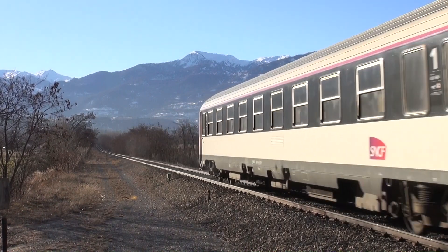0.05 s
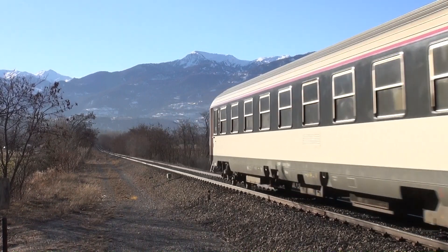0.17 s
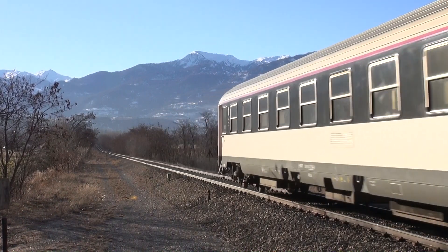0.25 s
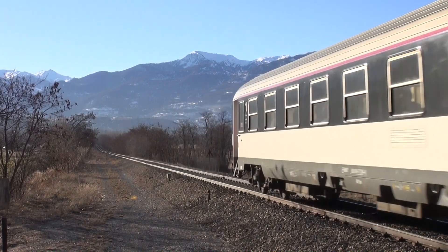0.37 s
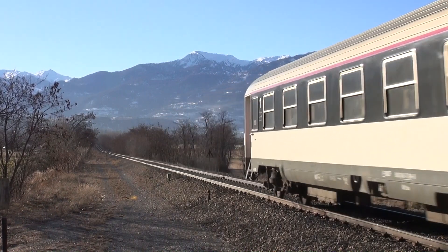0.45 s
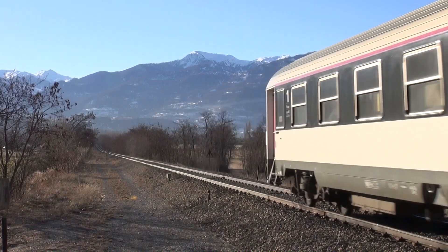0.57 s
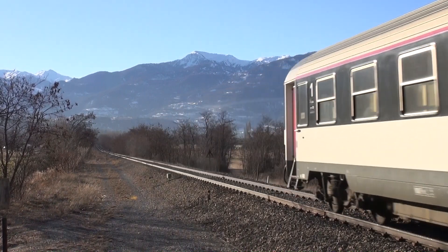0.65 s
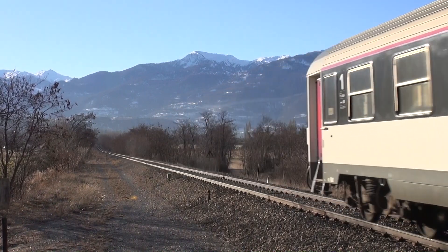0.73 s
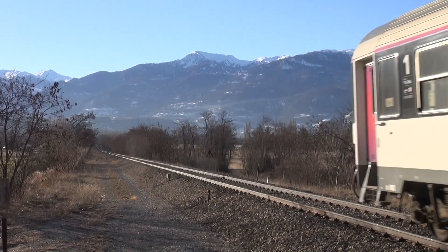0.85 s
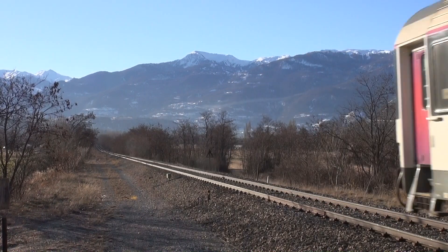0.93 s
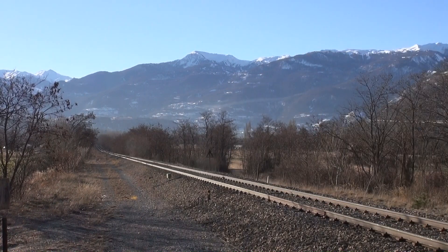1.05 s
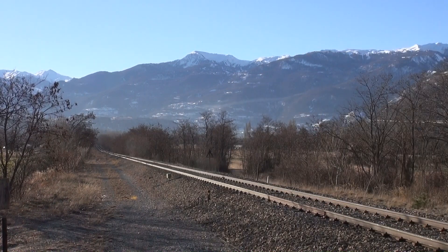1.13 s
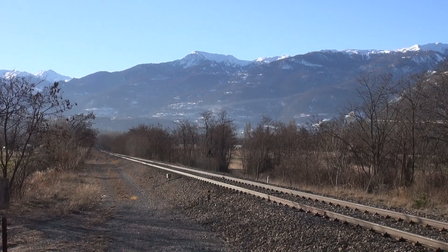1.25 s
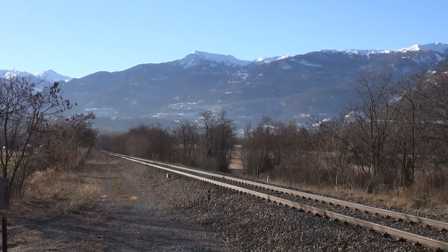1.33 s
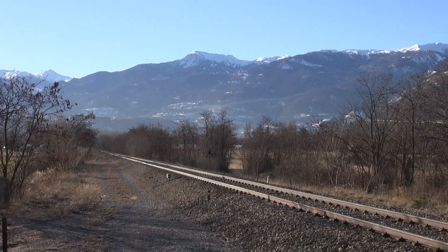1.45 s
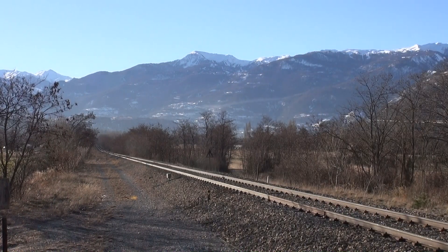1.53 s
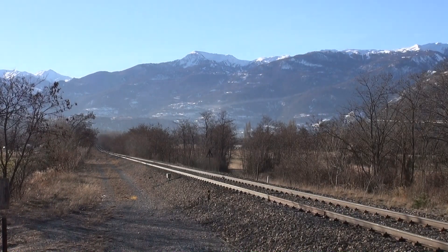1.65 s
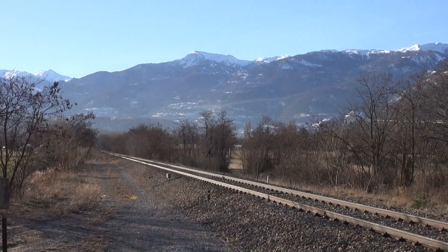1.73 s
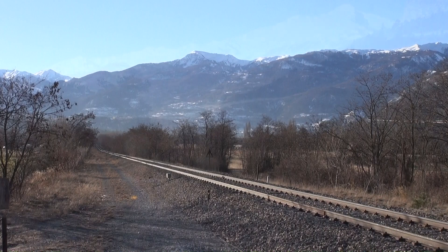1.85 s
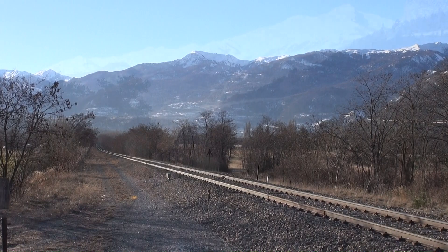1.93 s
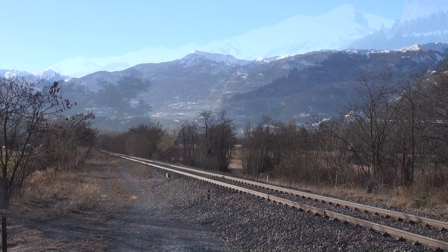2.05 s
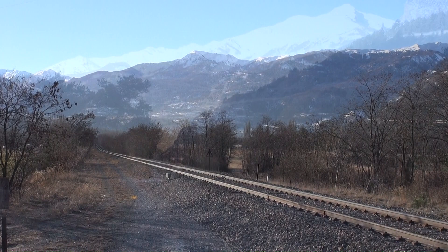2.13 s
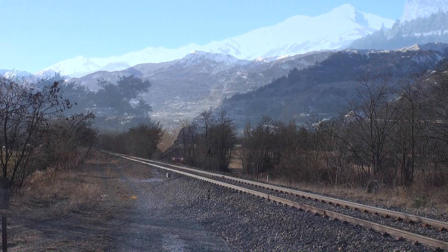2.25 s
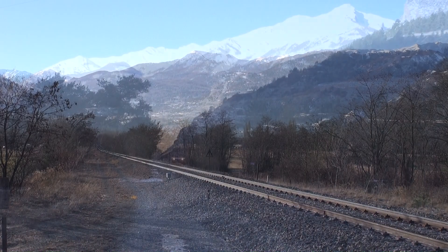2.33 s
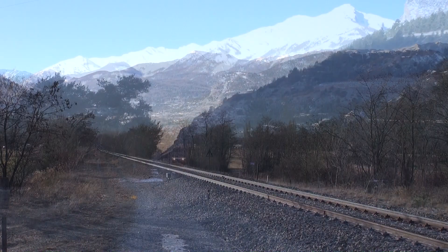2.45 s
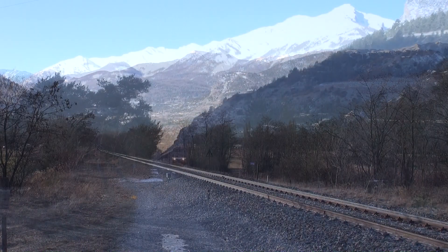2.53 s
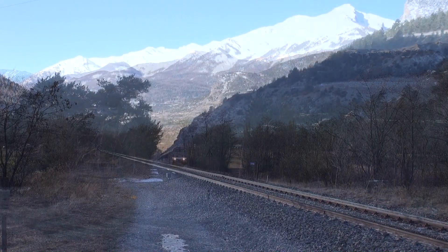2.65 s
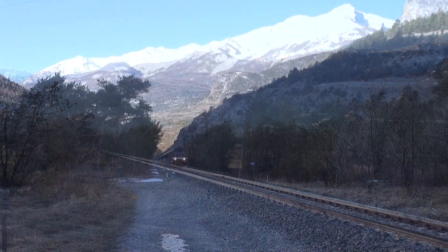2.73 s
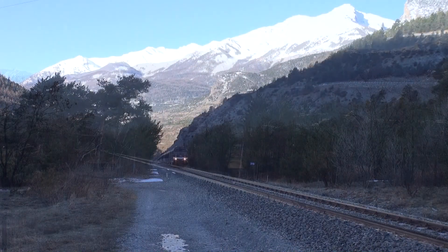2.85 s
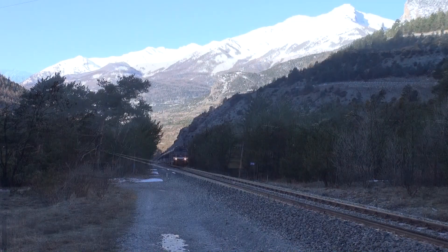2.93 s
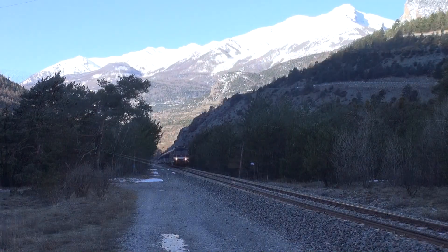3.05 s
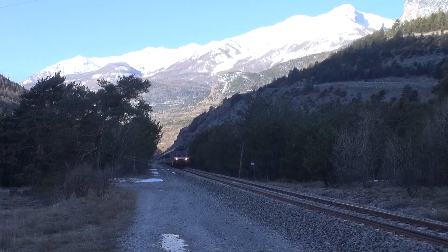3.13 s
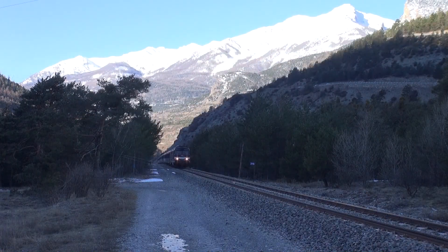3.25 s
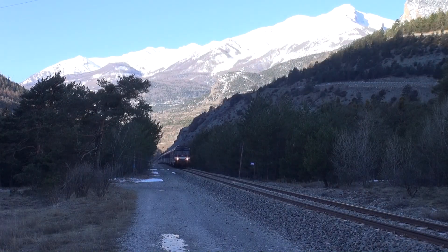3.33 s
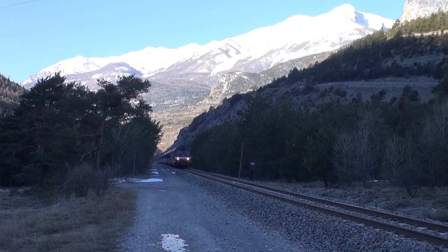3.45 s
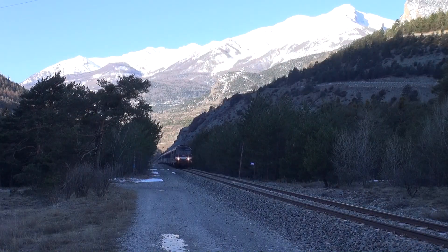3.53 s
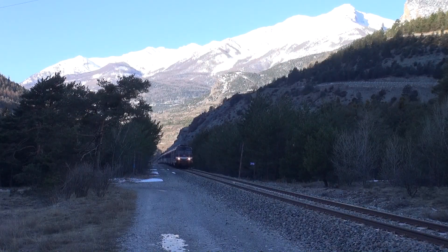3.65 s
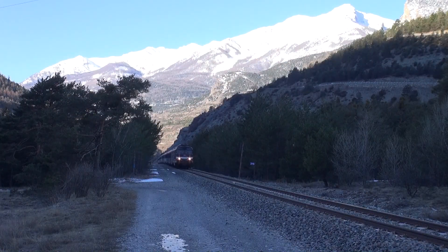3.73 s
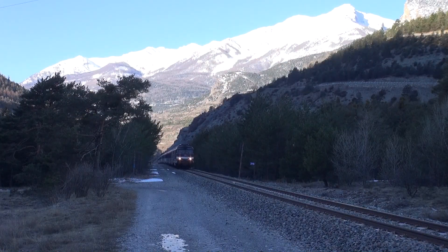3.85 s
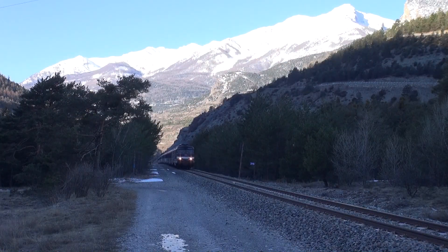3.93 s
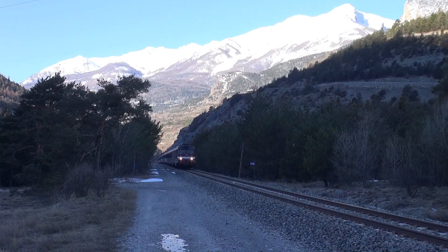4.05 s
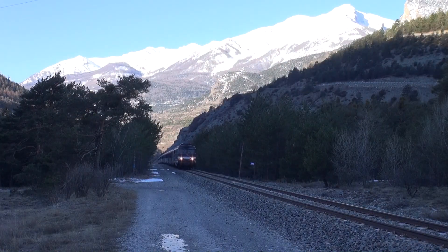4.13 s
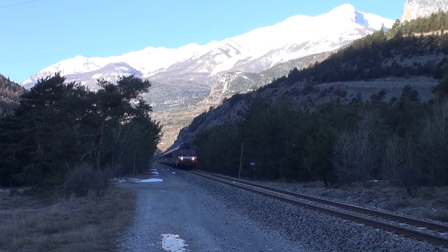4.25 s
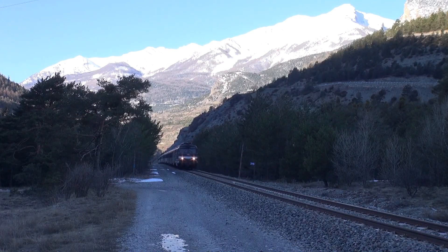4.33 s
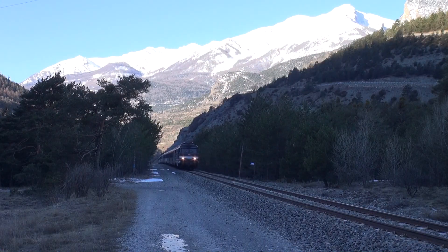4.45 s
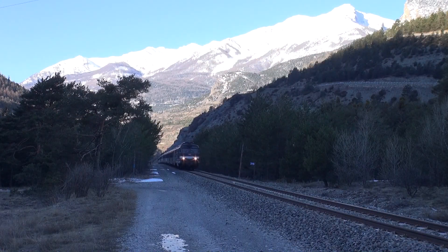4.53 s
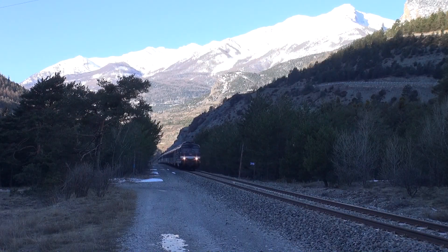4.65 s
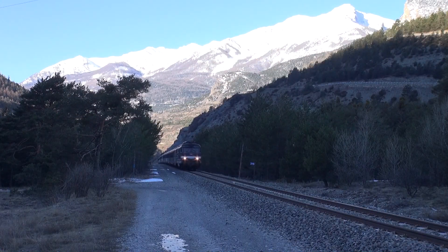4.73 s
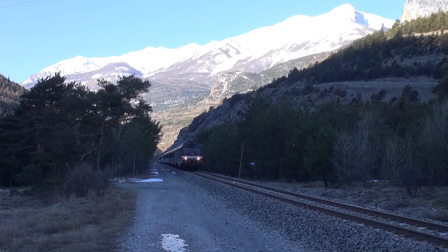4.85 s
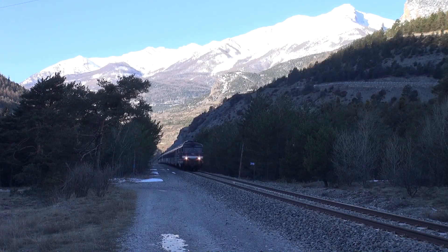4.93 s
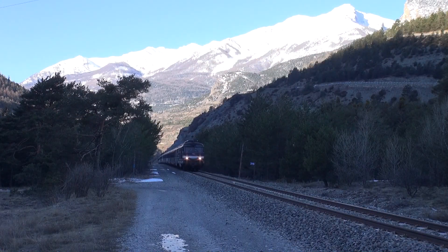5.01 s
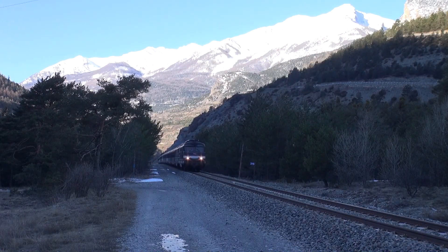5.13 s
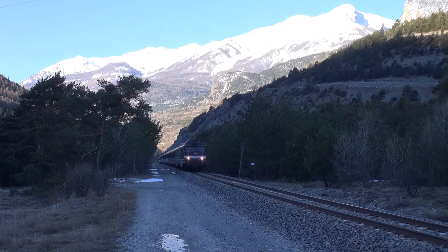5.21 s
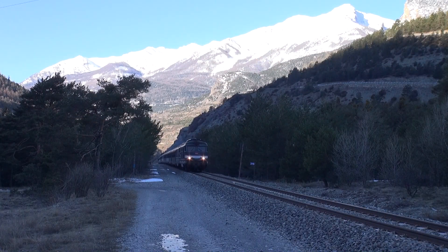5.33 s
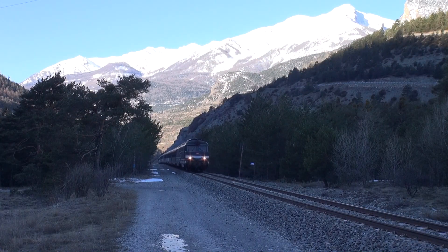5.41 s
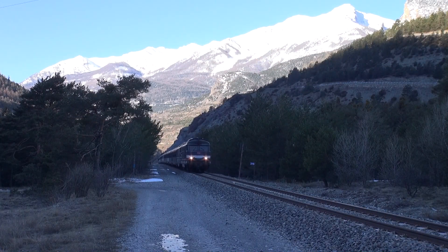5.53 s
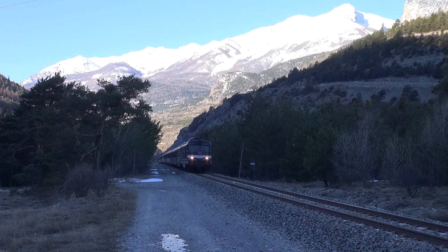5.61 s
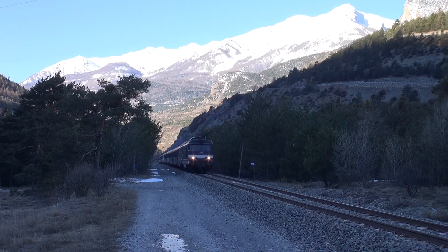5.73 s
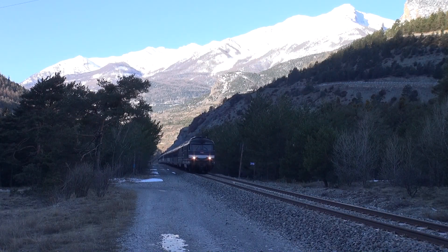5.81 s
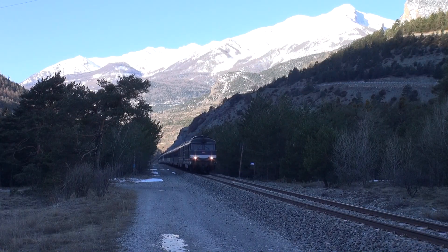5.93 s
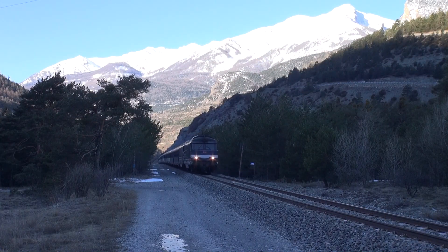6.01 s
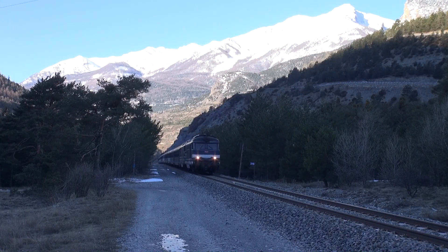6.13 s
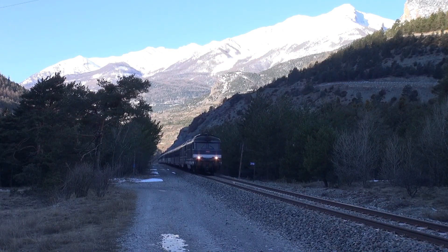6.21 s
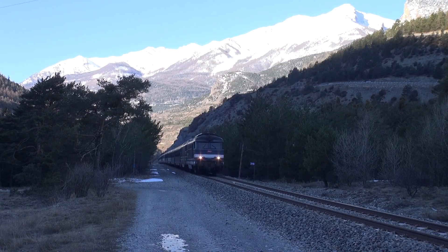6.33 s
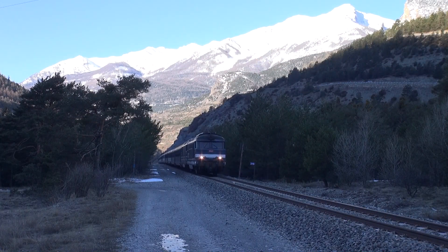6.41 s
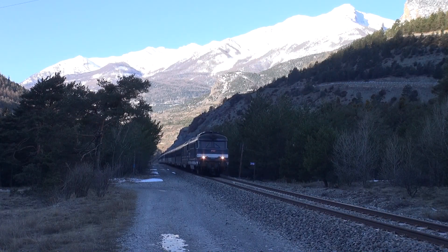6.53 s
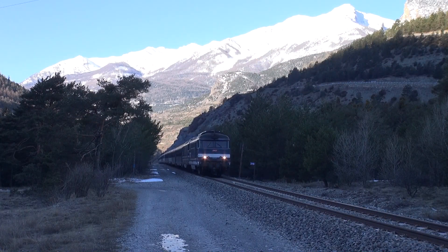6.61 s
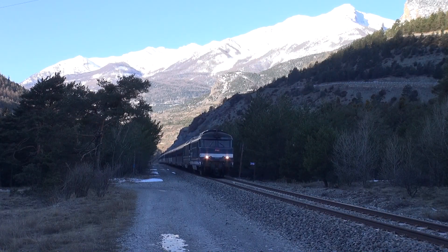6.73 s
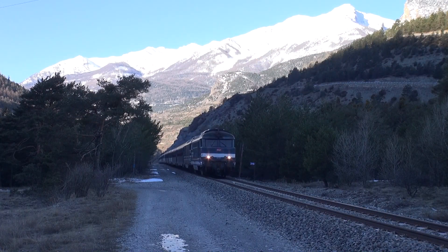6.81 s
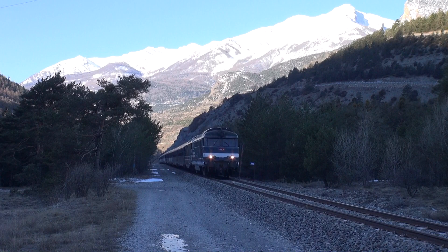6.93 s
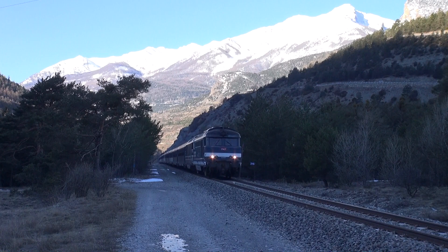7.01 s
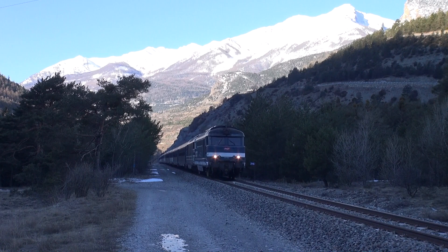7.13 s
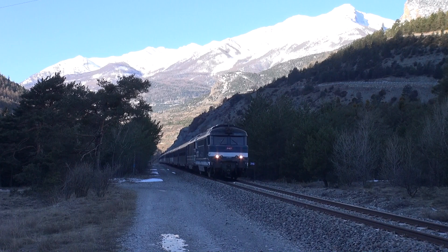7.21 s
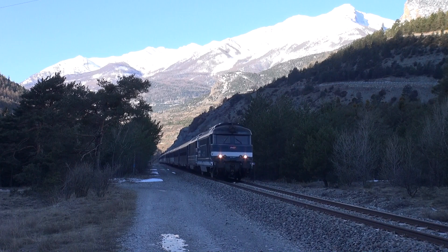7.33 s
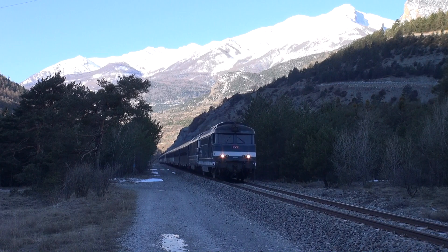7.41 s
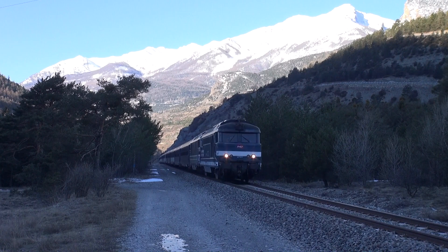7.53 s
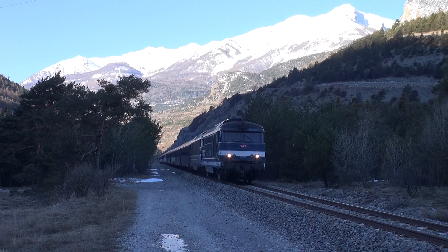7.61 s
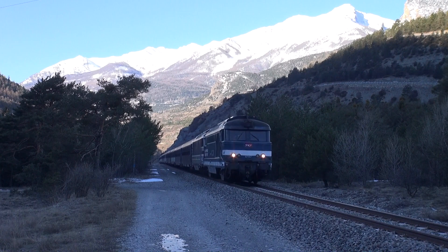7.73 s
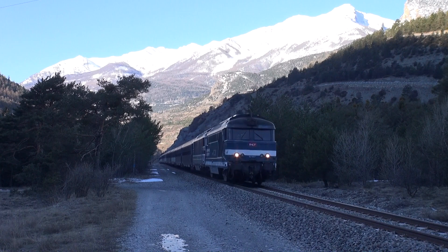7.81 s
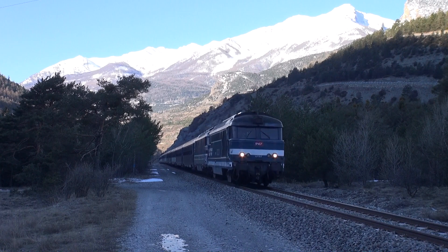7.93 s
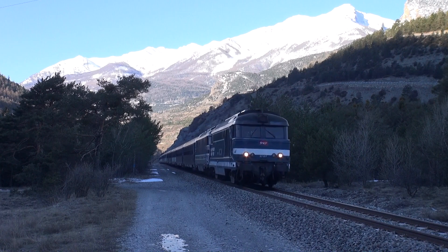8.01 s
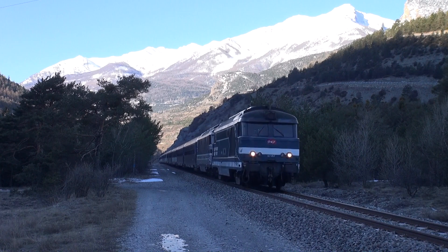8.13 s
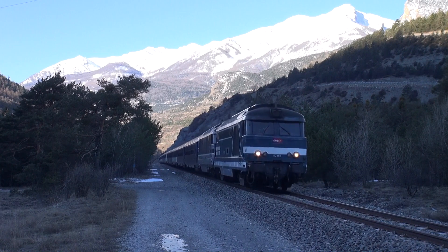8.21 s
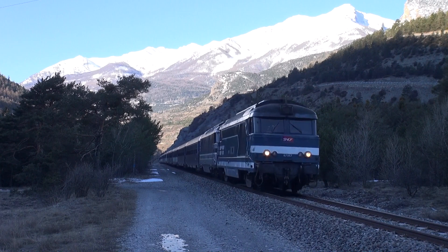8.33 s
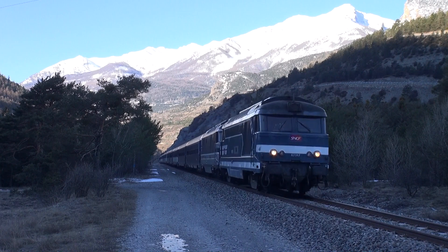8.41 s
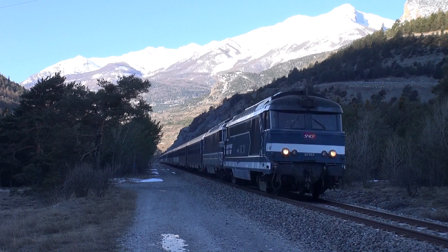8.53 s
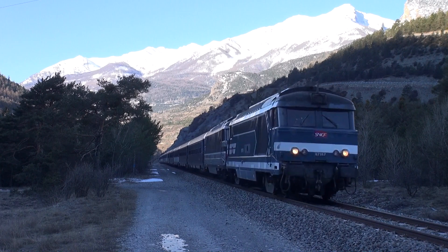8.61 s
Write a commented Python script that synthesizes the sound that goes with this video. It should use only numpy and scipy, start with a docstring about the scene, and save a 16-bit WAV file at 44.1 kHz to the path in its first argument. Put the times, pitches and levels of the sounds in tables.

```python
"""A mountain valley, stereo microphone beside the track: coaches roll past close by on the right and fade.
A diesel locomotive approaches: noise shaped into a rolling roar, a sine-built exhaust note, knocks.
Its horn, summed from partials plus puffs of air, sounds two blasts; between them, short of air, it jumps
to its upper register. Slopes throw the horn back at lower pitch, through long noise tails, and the
recorder's gain control ducks the engine under it."""
import sys
import numpy as np
from scipy import signal
from scipy.fft import rfft, irfft, next_fast_len
from scipy.io import wavfile
from scipy.ndimage import uniform_filter1d

SR = 44100
rng = np.random.default_rng(int(sys.argv[2]) if len(sys.argv) > 2 else 0)


def bounce(signal):
    """Save signal as a 16-bit WAV file at the path given by the first command-line argument."""
    frames = np.transpose(np.atleast_2d(signal))
    limited = np.clip(frames, -1, 1)
    pcm = np.round(limited * 32767).astype(np.int16)
    wavfile.write(sys.argv[1], SR, pcm)


N = 381906
T = np.arange(N) / SR  # s
HZ = np.fft.rfftfreq(1024, 1 / SR)  # bins of the noise spectra
FRAMES = np.arange(N // 256 + 5) * 256 / SR  # s, times of the noise spectra

# slopes that return the moving horn: [pitch factor, delay/s, level/dB]
SLOPES = [(.995, .012, -14.5), (.98, .05, -15.5), (.955, .06, -20), (.897, .08, -22)]
# dying away of the valley's echo: [f/Hz, t60/s]
VALLEY_T60 = [(300, 2.44), (700, 4.14), (1400, 2.63), (2500, 1.2), (5000, 1.3), (12000, .3)]
# colour of the echo off the forest: [f/Hz, level/dB]
FOREST_COLOUR = [(350, 0.5), (700, 1), (1100, -1), (2100, 4), (5000, -6), (12000, 1)]

# colour of the coaches' rolling noise: [f/Hz, relative level/dB per Hz]
COACH_COLOUR = [(30, -24), (80, -44), (150, -9), (230, -5), (400, -0.5), (620, -8.5), (840, -8.5),
                (1100, -19), (2300, -31), (5000, -35), (9500, -41.5), (12000, -39), (15800, -45.5)]
# left-right likeness of the coaches: [f/Hz, correlation]
COACH_LIKENESS = [(500, 1), (1650, 0.58), (5000, 0.055), (9000, 0.033), (11500, 0.9)]
# resonances of wheels and rails: [f/Hz, width/Hz, lift/dB]
STEEL_RESONANCES = [(1906, 290, 6), (2450, 140, 3), (3940, 670, 2.5), (6130, 460, 6)]
# wheel flanges brushing the rail: [mid t/s, length/s, f/Hz, width/Hz, level/dB]
FLANGE_SCRAPES = [(0.184, 0.06, 2490, 200, -36.5), (0.433, .05, 5900, 400, -45), (.81, .08, 5900, 400, -49),
                  (1.261, 0.31, 2525, 120, -40), (1.863, .1, 2400, 300, -42.5)]
# ticks of the running gear: [t/s, relative peak level/dB]
GEAR_TICKS = [(0.4334, -34), (0.6837, -30), (0.7905, -27.5), (0.8144, -32), (1.3667, -34), (1.4096, -34),
              (1.5622, -33), (1.6106, -43)]
# low swells from passing bogies and the air behind them: [mid t/s, length/s, f/Hz, width/Hz, level/dB]
BOGIE_SWELLS = [(.2, .7, 435, 120, -23), (1.12, .6, 474, 126, -28.5), (.83, .25, 237, 50, -26),
                (1.6, .3, 233, 70, -27), (1.92, .5, 100, 80, -45), (2.1, .17, 175, 60, -34)]
# the coaches' wheel rumble: [t/s, level/dB]
WHEEL_RUMBLE = [(0, -19.5), (.45, -20.5), (.8, -24.5), (1.03, -19.5), (1.78, -26.5), (2, -32.5),
                (2.25, -40), (3.2, -43.5)]
# bogies drawing level with the microphone: [t/s, steel-on-steel hiss level/dB]
BOGIES = [(-.15, -39.5), (.42, -43), (.82, -42), (1.52, -41)]
RING_DB, RING_SHARE = -16.5, 0.79  # ringing rails: dB at a rumble of 0 dB, dB per dB of rumble
ABREAST_S = 0.17  # a bogie's power is down to 36 % this long before and after it passes
RAIL_HISS_DB = -58.5  # the rails go on hissing behind the train
PAN_DB, PAN_SWING_DB, PAN_LAG_S = -9, -3, 0.12  # left over right; swings further right after each bogie

# roar of the distant locomotive: [f/Hz, relative level/dB per Hz]
FAR_COLOUR = [(30, -31), (70, -15), (170, -13), (400, -11.5), (560, -15.5), (780, -2.5), (1400, -10),
              (2100, -16), (3600, -28.5), (5000, -38.5), (9000, -54.5), (14000, -47.5), (15800, -68)]
# roar of the locomotive closer by: [f/Hz, relative level/dB per Hz]
NEAR_COLOUR = [(30, -45), (70, -6), (170, -6.5), (340, -1), (520, -11), (900, -11), (2000, -19.5),
               (3600, -32.5), (5000, -42), (6500, -39.5), (9000, -57.5), (14000, -47), (15800, -52)]
# left-right likeness of the locomotive: [f/Hz, correlation]
TRAIN_LIKENESS = [(4000, .99), (9000, 0.43), (12000, 0.94)]
# resonances of the locomotive and its track: [f/Hz, width/Hz, lift/dB]
BODY_RESONANCES = [(1120, 50, 1), (1490, 340, -3.5), (1940, 340, 2), (2986, 370, 5.5), (3730, 470, 5)]
# pitch of the exhaust note, about which it wavers: [t/s, f/Hz]
EXHAUST_PITCH = [(2.6, 149.2), (4.69, 150.2), (8.66, 150.3)]
# partials of the exhaust: [multiple of the exhaust note, relative level/dB]
EXHAUST_PARTIALS = [(.3, -35), (0.501, -11.5), (1, 2), (1.5, -18.5), (2.001, -24.5)]
# wheels knocking on the track: [t/s, relative peak level/dB]
TRACK_KNOCKS = [(7.764, -16), (7.923, -15), (8.101, -13), (8.446, -17)]
# low, middle and high roar, before a common lift:
# [level/dB at the reference distance, loss/dB per doubling of distance, background level/dB]
ROAR_BANDS = [(-30, 6, -42.5), (-27, 7, -44.5), (-42, 10, -65)]
ARRIVAL_S, SPEED_M_PER_S, REFERENCE_M = 9.653, 26.6, 25.3  # the locomotive nears at a steady speed
EXHAUST_DB, EXHAUST_LOSS_DB = -28, 5.5  # at the reference distance; lost per doubling of distance

# partials of the first and of the second blast: [multiple, relative level/dB]
BLAST_PARTIALS = [
    [(1, 0.5), (2, -1.5), (3, 5.5), (4, -0.5), (5, -8.5), (6, -5.5), (7, -5.5), (8, -15.5), (9, -21),
     (10, -14.5), (11, -15.5), (12, -30), (13, -24), (14, -23), (15, -22.5)],
    [(1, -2), (2, -2.5), (3, 0.5), (4, -7), (5, -9), (6, -7), (7, -14.5), (8, -19), (9, -17), (10, -16.5),
     (11, -25), (12, -29), (13, -22), (14, -30), (15, -38)],
]
# highest partials of both blasts: [f/Hz, relative level/dB]
TOP_PARTIALS = [(6000, -27.5), (7500, -41), (9000, -47), (12000, -41.5), (15500, -41.5)]
# partials of the upper register: [multiple, relative level/dB]
UPPER_PARTIALS = [(1, -1), (2, 1), (3, -6.5), (4, -12.5), (5, -15.5), (6, -23), (8, -27.5), (12, -41),
                  (22, -48)]
# squeaks of the horn at low pressure: [t/s, length/s, starting f/Hz, level/dB]
SQUEAKS = [(5.026, 0.083, 2006, -22.5), (5.285, 0.069, 2030, -23)]
# colour of the air escaping through the horn: [f/Hz, relative level/dB per Hz]
AIR_COLOUR = [(500, -16.5), (1500, -3), (3000, -13), (6000, -19.5), (9000, -31), (12500, -42), (15800, -42)]
# pulls on the horn valve, which catches briefly in the first blast:
# [t/s, held/s, rise/s, starting bend/semitones, level/dB]
VALVE_PULLS = [(4.165, .226, 0.0028, 0.69, 0), (4.474, .253, 0.012, -1, -1.5), (5.346, .41, 0.0023, .3, -1)]
BLAST_HZ, BLAST_CLOSE_S = 355.1, 0.085  # pitch at full pressure; time that the valve takes to close
SETTLE_S = .011  # time constant of the starting bend
SAG_PER_S, SAG_DB_PER_S = .012, 8.5  # pitch (as a share) and level sag with the air pressure
FLICK, FLICK_S, CLOSE_DB = .032, 0.033, -11.5  # closing valve: pitch flicks up by this share, level falls
# the horn's upper register, one note; bend and flick are shares of its pitch
UPPER_S, UPPER_HELD_S, UPPER_HZ, UPPER_DB = 4.765, .155, 677.5, -6
UPPER_BEND, UPPER_SETTLE_S, UPPER_FLICK, UPPER_FADE_DB_PER_S = 0.0572, 0.0223, .018, 127
UPPER_SWELL_DB, UPPER_WAVER = 2, 0.0038  # growth while held; rms waver as a share of pitch
SQUEAK_GLIDE_HZ_PER_S, SQUEAK_RISE_S = 1400, 0.028

CUT_HZ = 15850  # upper limit of the recorder


def amp(db):
    """Decibels to gain."""
    return 10 ** (np.asarray(db) / 20)


def unit(x):
    """Scaled to an rms of 1."""
    return x / np.sqrt(np.mean(x ** 2) + 1e-20)


def follow(rows, t):
    """The columns of a curve table at times t."""
    s, *columns = np.transpose(rows)
    return [np.interp(t, s, column) for column in columns]


def read(points, hz):
    """A spectrum table at frequencies hz, interpolated along log frequency."""
    f, value = np.transpose(points)
    return np.interp(np.log(hz + 1), np.log(f + 1), value)


def add(mix, s, sound):
    """Mixes in a sound that starts at s, trimmed to the length of the mix."""
    start = round(s * SR)
    sound = sound[max(-start, 0):]
    part = mix[max(start, 0):][:len(sound)]
    part += sound[:len(part)]


def band(size, hz, width):
    """Noise in one resonance at an rms of 1; at 0 Hz, a random drift."""
    f = np.fft.rfftfreq(next_fast_len(size + SR // 4, True), 1 / SR)
    spectrum = rfft(rng.standard_normal(2 * len(f) - 2))
    resonance = 1 / (1 + (2 * (f - hz) / width) ** 4)
    return unit(irfft(spectrum * resonance)[:size])


def lifts(resonances):
    """dB added to a spectrum by broad resonances."""
    return sum(db / (1 + (2 * (HZ - hz) / width) ** 4) for hz, width, db in resonances)


def rolling(colour_db, levels_db, edges, likeness, phase, patchy_db, flicker_db):
    """Stereo rolling noise: low, middle and high parts at their own levels, mottled by rough wheel treads."""
    shape = amp(colour_db) * np.ones((len(FRAMES), 1))
    below = [1 / (1 + (HZ / edge) ** 8) for edge in edges]
    shares = below[0], below[1] - below[0], 1 - below[1]
    power = 0
    for share, db in zip(shares, levels_db):
        part = shape ** 2 * share
        power = power + abs(part) / part.sum(1, keepdims=True) * amp(db)[:, None] ** 2

    a, b, c, d, patches = rng.standard_normal((5, len(FRAMES), len(HZ)))
    # patches smeared over time, then frequency; flicker moves all but the low part together
    patches = unit(uniform_filter1d(uniform_filter1d(patches, size=12, axis=0), size=9, axis=1))
    flicker = unit(uniform_filter1d(rng.standard_normal(len(FRAMES)), size=3))
    flicker = flicker[:, None] * (1 - below[0])

    like = np.clip(read(likeness, HZ), -1, 1)
    left = a + 1j * b
    right = (like * left + np.sqrt(1 - like ** 2) * (c + 1j * d)) * np.exp(-1j * phase)
    spectra = np.array([left, right]) * np.sqrt(power)
    spectra *= amp(patchy_db * patches + flicker_db * flicker)
    noise = signal.istft(spectra.swapaxes(1, 2), nperseg=1024, noverlap=768)[1]
    return np.sqrt(1.5) * noise[:, :N]  # makes up for the overlap of the frames


def hits(rows, hz, width, t60):
    """Short blows, each a dying burst in one resonance."""
    out, t = np.zeros(N), np.arange(SR // 6) / SR
    for s, db in rows:
        burst = band(len(t), hz, width) * amp(-60 * t / t60) * (1 - np.exp(-t * hz))
        add(out, s, amp(db) * burst / abs(burst).max())
    return out


def swells(rows):
    """Resonances that rise and fall as their source goes by."""
    out = np.zeros(N)
    for s, length, hz, width, db in rows:
        size = int(length * SR)
        add(out, s - length / 2, amp(db) * band(size, hz, width) * np.hanning(size))
    return out


def valley(x):
    """Slopes that the horn is not heading for return it lower in pitch: a strong onset, then a long dull tail."""
    out, size = np.zeros((2, N)), 3 * SR
    hz, t, spectra = signal.stft(rng.standard_normal((len(SLOPES), 2, size)), SR, nperseg=256)
    decay_db = -60 * t / read(VALLEY_T60, hz)[:, None]
    onset_db = 6 * np.exp(-t / 0.11)
    spectra = spectra * amp(decay_db + read(FOREST_COLOUR, hz)[:, None] + onset_db)
    tails = signal.istft(spectra, SR, nperseg=256)[1]
    for (factor, delay, db), tail in zip(SLOPES, tails):
        tail = tail[0] + 0.14 * np.array([[1], [-1]]) * tail[1]  # mostly alike left and right
        tail /= np.sqrt(np.mean(abs(rfft(tail[0], SR * 3)[1500:4500]) ** 2))  # unit gain, 500-1500 Hz
        wander = .00018 * band(N, 0, 24)  # s
        # the path lengthens steadily about the middle of the call, and wavers as trees and rocks slide by
        shifted = np.interp(5 + (T - delay - 5) * factor + wander, T, x)
        out += amp(db) * signal.oaconvolve(shifted[None], tail, axes=1)[:, :N]
    return out


def abreast(t, s):
    """Share of its full power that reaches the microphone from a bogie passing at s."""
    return 1 / (1 + ((t - s) / ABREAST_S) ** 2) ** 1.48


def coaches():
    """Bogies rumble by, each with a surge of hiss; flanges scrape, and the running gear ticks."""
    rumble_db, = follow(WHEEL_RUMBLE, FRAMES)
    ring_db = RING_DB + RING_SHARE * rumble_db
    hiss_power = amp(RAIL_HISS_DB) ** 2 + sum(amp(db) ** 2 * abreast(FRAMES, s) for s, db in BOGIES)
    levels = rumble_db, ring_db, 10 * np.log10(hiss_power)
    phase = -2 * np.pi * HZ * 4.5e-5 / (1 + (HZ / 4000) ** 4)  # the right channel hears the rumble first
    colour = read(COACH_COLOUR, HZ) + lifts(STEEL_RESONANCES)
    roll = rolling(colour, levels, (1200, 5000), COACH_LIKENESS, phase, patchy_db=1.58, flicker_db=1.16)
    ticks = amp(-4) * hits(GEAR_TICKS, hz=9000, width=15000, t60=0.084)
    sound = roll + swells(BOGIE_SWELLS) + swells(FLANGE_SCRAPES) + ticks

    # the rumble follows the bogies; deep bass and treble spread along the rails
    rumble_filter = signal.butter(1, [105, 2500], "bandpass", fs=SR, output="sos")
    rumble = signal.sosfiltfilt(rumble_filter, sound)
    passing = sum(abreast(T - PAN_LAG_S, s) for s, _ in BOGIES[1:])
    pan = amp((PAN_DB + PAN_SWING_DB * passing) * np.array([[.5], [-.5]]))
    return rumble * pan / pan.mean(0) + sound - rumble


def locomotive():
    """The exhaust note and its pulsing clatter, over a rolling roar that changes colour as the train nears."""
    distance = SPEED_M_PER_S * np.maximum(ARRIVAL_S - FRAMES, .1)
    doublings = np.log2(distance / REFERENCE_M)
    levels = [10 * np.log10(amp(db - loss * doublings) ** 2 + amp(floor_db) ** 2)
              for db, loss, floor_db in ROAR_BANDS]
    near = np.clip((FRAMES - 4.5) / 0.99, 0, 1)[:, None]
    colour = (1 - near) * read(FAR_COLOUR, HZ) + near * read(NEAR_COLOUR, HZ) + lifts(BODY_RESONANCES)
    colour = colour + lifts([(159, 29, -1)])  # the exhaust note stands clear of the rumble
    roar = rolling(colour, levels, (600, 4500), TRAIN_LIKENESS, 0, patchy_db=0.93, flicker_db=0.0)

    exhaust_hz = follow(EXHAUST_PITCH, T)[0] * (1 + 0.0018 * band(N, 0, 20))
    turns = np.cumsum(exhaust_hz) / SR
    note = 0
    for multiple, db in EXHAUST_PARTIALS:
        gain = amp(db + 0.48 * band(N, 0, 19))
        note = note + gain * np.sin(2 * np.pi * (multiple * turns + rng.random()))
    note_db = EXHAUST_DB - EXHAUST_LOSS_DB * doublings
    clatter = 1 + 0.051 * np.cos(np.pi * turns)  # pulses at half the exhaust pitch
    knocks = amp(-7.0) * hits(TRACK_KNOCKS, hz=354, width=155, t60=0.1)
    return amp(3.0) * roar * clatter + note * amp(np.interp(T, FRAMES, note_db)) + knocks


def diaphragm(note, partials_db, dulling_db, rough_above_hz):
    """A vibrating diaphragm: its brightness shifts as the level falls, and it roughens when forced sharp."""
    t, hz, db = note
    rough = np.clip((hz - rough_above_hz) / 9, 0, 1)
    jitter = (.0008 + .007 * rough) * band(len(t), 0, 700)
    turns = np.cumsum(hz * (1 + jitter)) / SR
    slack_db = np.minimum(db - np.percentile(db, 70), 0)
    # positive dulling_db dulls weak moments, negative brightens them
    # the high partials need a few cycles to build up
    tilt_db = dulling_db * slack_db - 7 * np.exp(-(t - t[0]) / 0.011)
    knots, stack = FRAMES[::9], 0
    for k, partial_db in enumerate(partials_db, 1):
        # moving air makes each partial fade a little on its own
        fading_db = .9 * np.log(1 + k) * np.interp(t, knots, rng.standard_normal(len(knots)))
        flare = 4 * np.log(k)  # rad; the bell holds back the low partials
        gain = amp(partial_db + tilt_db * np.log(k) + fading_db)
        stack = stack + gain * np.cos(2 * np.pi * k * turns - flare)
    stack = stack * (1 + (.03 + .14 * rough) * band(len(t), 0, 600))
    edges = np.clip(np.minimum(t - t[0], (t[-1] - t) / 4) / 0.0014, 0, 1)
    out = np.zeros(N)
    add(out, t[0], stack * amp(db) * edges / np.sqrt(np.sum(amp(partials_db) ** 2) / 2))
    return out


def escaping_air(note):
    """Hiss let out in puffs by the swinging diaphragm; the flow takes a moment to build up."""
    colour = amp(read(AIR_COLOUR, np.fft.rfftfreq(N, 1 / SR)))
    hiss = irfft(rfft(rng.standard_normal(N)) * colour, N)
    flow = signal.sosfilt(signal.butter(1, 16, fs=SR, output="sos"), abs(note))
    puffs = abs(uniform_filter1d(abs(note), size=30))
    return amp(-4) * hiss * np.sqrt(flow * puffs)


def blast(start, held, rise, bend, level_db):
    """Time, pitch and level of one pull: the note settles, sags, then flicks up and dies as the valve closes."""
    t = np.arange(0, held + BLAST_CLOSE_S, 1 / SR)
    closing = np.maximum(t - held, 0)
    hz = BLAST_HZ * 2 ** (bend * np.exp(-t / SETTLE_S) / 12)
    hz = hz * (1 - SAG_PER_S * t + FLICK * np.minimum(closing / FLICK_S, 1))
    db = level_db - 7 * np.exp(-t / rise) - SAG_DB_PER_S * t + CLOSE_DB * (closing / BLAST_CLOSE_S) ** 3
    return start + t, hz, db


def upper_note():
    """Time, pitch and level of the upper register: it slides into tune, swells, fades as the air runs out."""
    t = np.arange(0, 2 * UPPER_HELD_S, 1 / SR)
    closing = np.maximum(t - UPPER_HELD_S, 0)
    settling = np.exp(-t / UPPER_SETTLE_S)
    hz = UPPER_HZ * (1 + UPPER_BEND * settling + UPPER_FLICK * np.minimum(closing / FLICK_S, 1))
    hz = hz * (1 + UPPER_WAVER * band(len(t), 0, 64))
    swell_db = UPPER_SWELL_DB * np.minimum(t / UPPER_HELD_S - 1, 0)
    return UPPER_S + t, hz, UPPER_DB + swell_db - UPPER_FADE_DB_PER_S * closing


def squeak(start, length, hz, level_db):
    """Time, pitch and level of a thin squeak that swells as it glides up."""
    t = np.arange(0, length, 1 / SR)
    rise_db = -22 * np.maximum(1 - t / SQUEAK_RISE_S, 0)
    return start + t, hz + SQUEAK_GLIDE_HZ_PER_S * t, level_db + rise_db


def horn():
    """Two full blasts, with the upper register and thin squeaks between them, and their echoes."""
    blasts = np.zeros(N)
    for pull in VALVE_PULLS:
        bell = BLAST_PARTIALS[int(pull[0] > UPPER_S)]
        top_db = read(TOP_PARTIALS, np.arange(len(bell) + 1, 45) * BLAST_HZ)
        partials_db = np.r_[np.transpose(bell)[1], top_db]
        blasts += diaphragm(blast(*pull), partials_db, dulling_db=-0.14, rough_above_hz=BLAST_HZ)
    # the short bell radiates little bass
    blasts = signal.sosfilt(signal.butter(4, 270, "highpass", fs=SR, output="sos"), blasts)
    air = np.array([escaping_air(blasts) for _ in range(3)])
    air = air[0] + 0.97 * air[1:]  # one hiss common to both channels, one of its own in each
    # the valve snaps open
    pops = hits([(pull[0], -9) for pull in VALVE_PULLS[::2]], hz=456, width=180, t60=0.016)
    upper_db = read(UPPER_PARTIALS, np.arange(1, 23))
    upper = diaphragm(upper_note(), upper_db, dulling_db=1.6, rough_above_hz=672)
    # squeaks are single partials and never roughen
    squeaks = sum(diaphragm(squeak(*row), np.zeros(1), dulling_db=0, rough_above_hz=SR) for row in SQUEAKS)
    # the lowest partials of the upper register spread wide and reach the slopes most strongly
    spread = signal.sosfilt(signal.butter(2, 800, fs=SR, output="sos"), upper)
    return blasts + air + pops + upper + squeaks + valley(blasts + amp(14.0) * spread)


def scene():
    """The coaches give way to the approaching locomotive and its horn."""
    change = np.clip((T - 1.95) / 1.34, 0, 1)
    leaving = np.sqrt(1 - change ** 2) * coaches()
    nearing = np.sqrt(np.sin(np.pi / 2 * change)) * locomotive()
    return leaving + nearing + horn()


def record(dry):
    """Gain control drops at once and recovers slowly; peaks are rounded off; then the band limit."""
    power_db = 10 * np.log10(abs(uniform_filter1d((dry ** 2).mean(0), size=500)) + 1e-12)
    recovery_db = 6.85 * T  # dB per second
    held_db = np.maximum.accumulate(power_db + recovery_db) - recovery_db
    over_db = np.maximum(held_db + 15.5, 0)  # threshold -15.5 dB
    ducked = dry * amp(-uniform_filter1d(over_db, size=200))
    rounded = ducked / (1 + (ducked / .5) ** 8) ** (1 / 8)
    lowpass = signal.firwin(511, CUT_HZ, window=("kaiser", 9), fs=SR)
    return signal.oaconvolve(rounded, lowpass[None], "same")


dry = scene()
out = record(dry)
bounce(out)
```